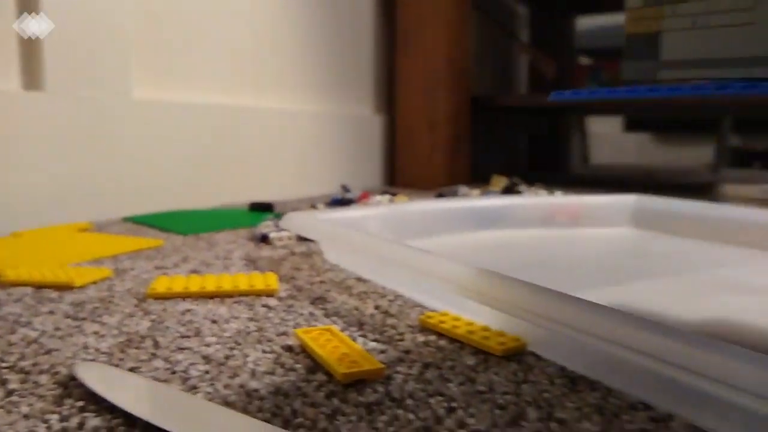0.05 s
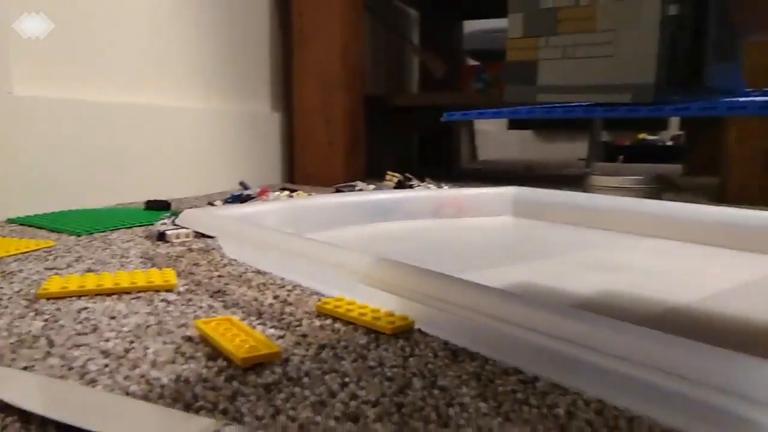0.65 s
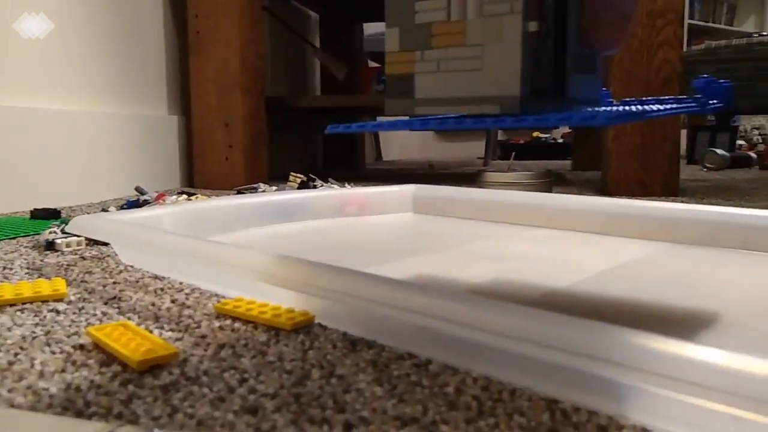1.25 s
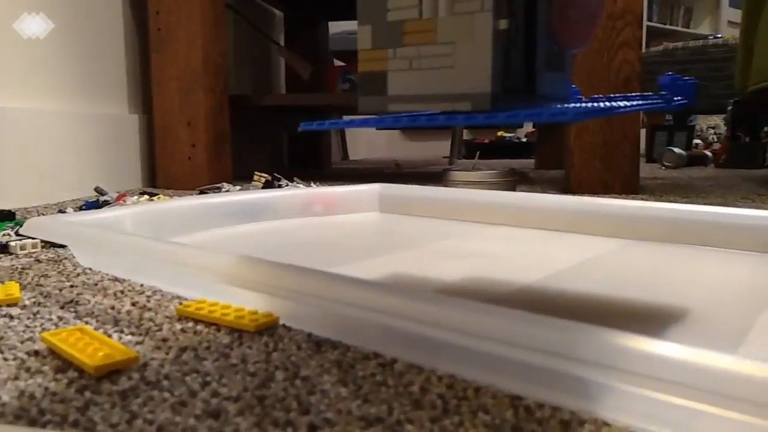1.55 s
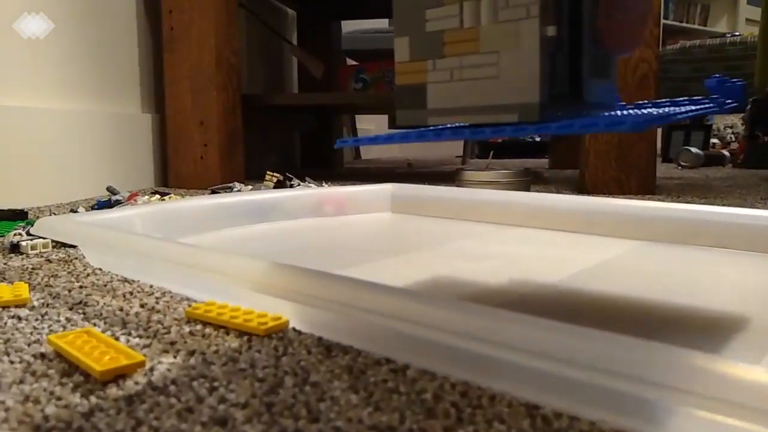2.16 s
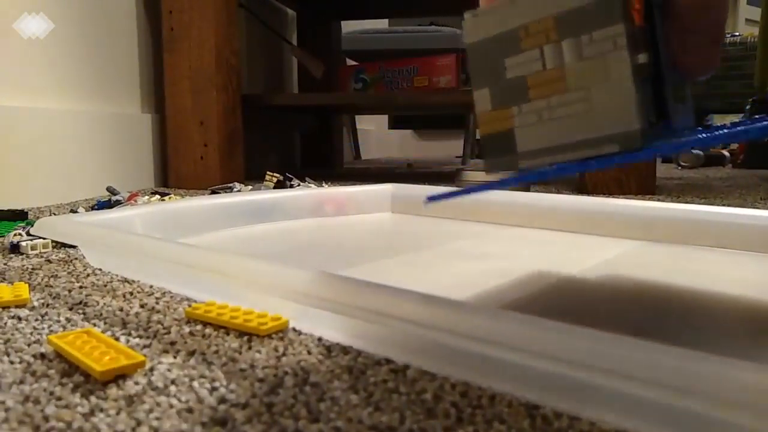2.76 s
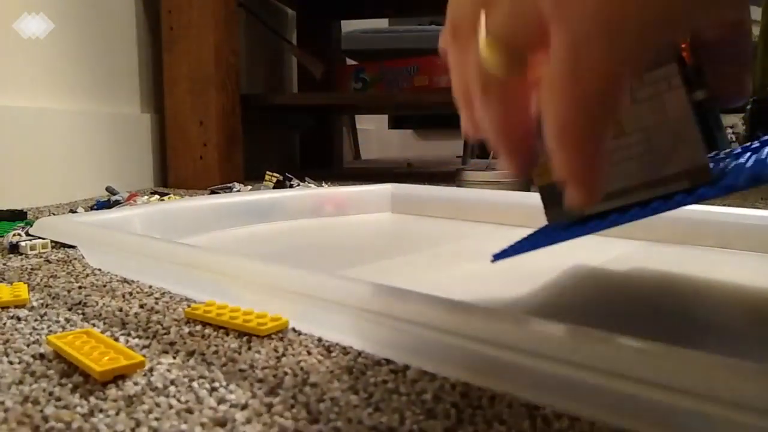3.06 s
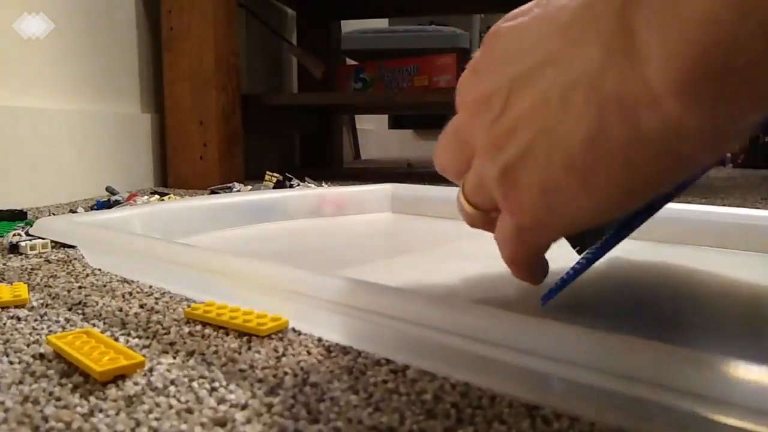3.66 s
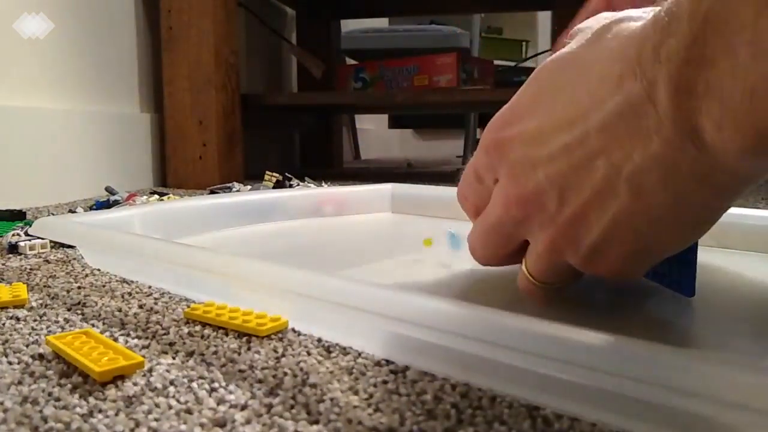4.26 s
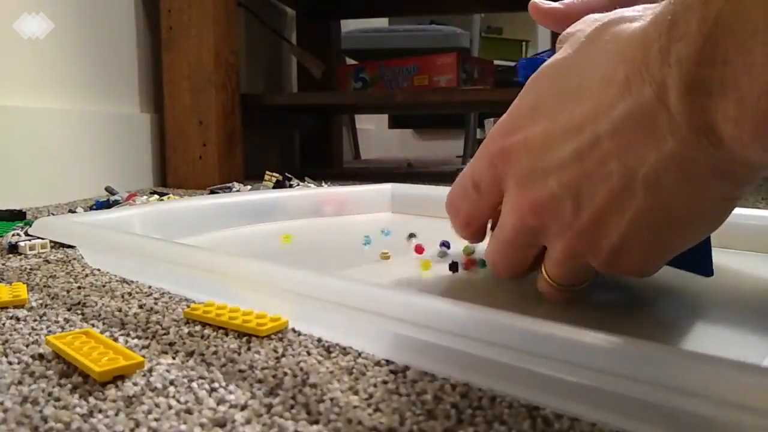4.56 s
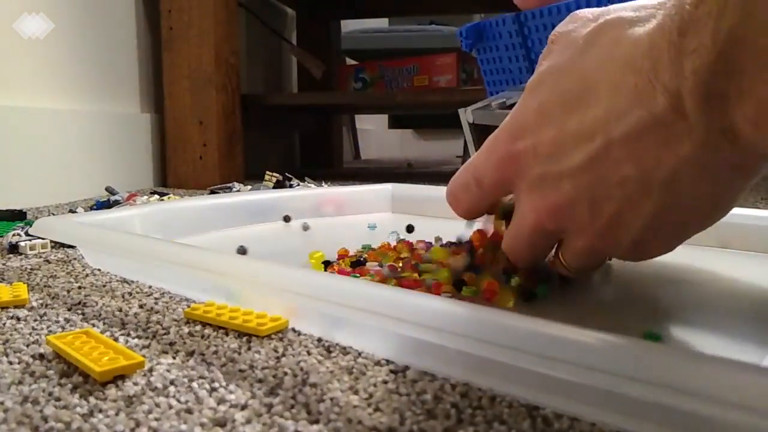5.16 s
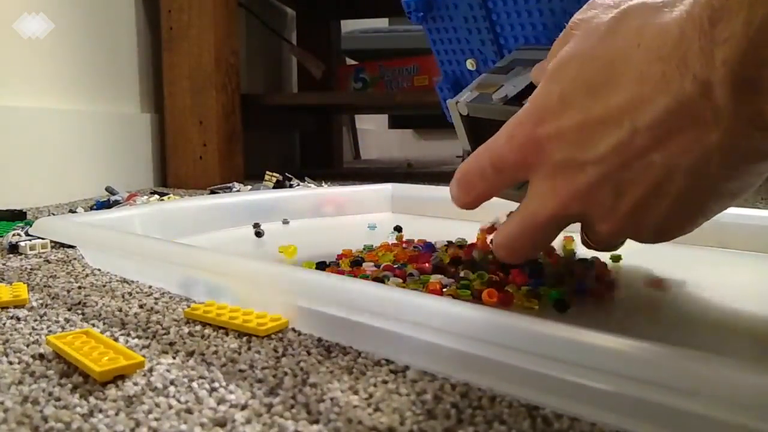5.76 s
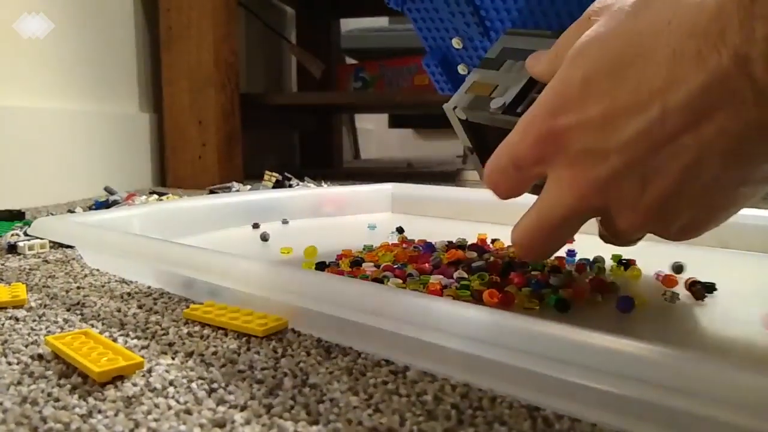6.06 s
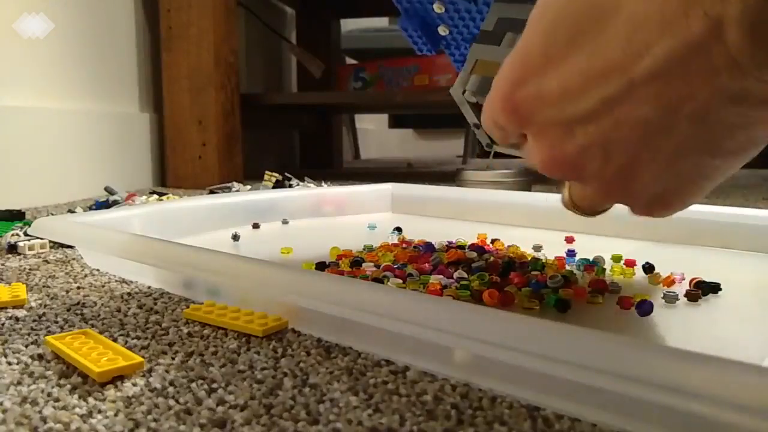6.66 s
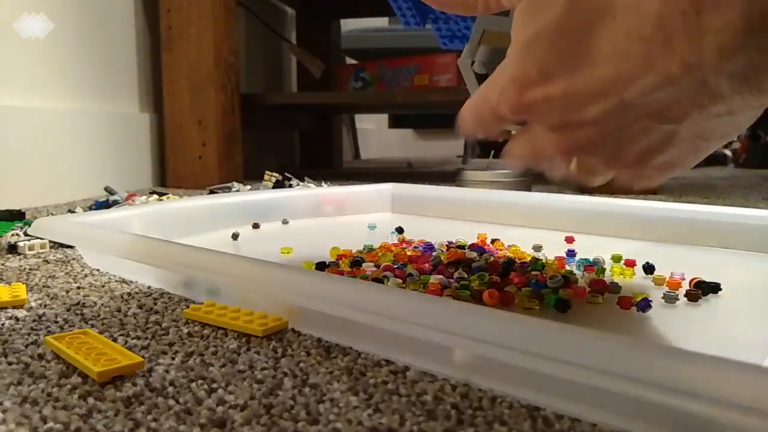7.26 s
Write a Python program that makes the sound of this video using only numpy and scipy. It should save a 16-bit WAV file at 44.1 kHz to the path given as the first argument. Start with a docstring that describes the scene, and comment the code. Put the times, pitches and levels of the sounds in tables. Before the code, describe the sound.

A toy brick box snaps as it is handled, then small plastic pieces slide out and clatter into a plastic tub.

```python
"""Fingers shift on a hand-held camera in a small room; close by, a hollow box of toy bricks is handled
with a few snaps. From 2.6 s the grip shifts and the box tips over a shallow plastic tub on a carpet:
hundreds of small plastic dots slide inside it. From 4 s they pour out, clatter on the tub floor and
heap up. Stragglers follow near 6.4 s, last knocks at 7 s. Heard through the camera's two mic ports."""
import sys
import numpy as np
from scipy import signal
from scipy.fft import rfft, irfft
from scipy.io import wavfile
from scipy.ndimage import uniform_filter1d

SR = 44100
rng = np.random.default_rng(int(sys.argv[2]) if len(sys.argv) > 2 else 0)


def inscribe(sig):
    """Save sig as 16-bit PCM at rate SR to the path in sys.argv[1].

    A 1-D sig is mono; a 2-D sig holds one channel per row.
    Samples are clipped to [-1, 1] before scaling.
    """
    pcm = np.round(np.clip(np.atleast_2d(sig).T, -1, 1) * 32767)
    wavfile.write(sys.argv[1], SR, pcm.astype(np.int16))


N = 321930
TIME_S = np.arange(N) / SR
IMPACT_TIME_S = np.arange(4096) / SR

# skin on plastic: freq_hz, density_db
RUSTLE_SPECTRUM = [(40, -29), (120, 6.5), (220, -5), (320, 3), (420, -2), (620, 3.5), (1100, -2.5),
                   (1600, -33), (3000, -39), (6000, -13), (16000, -38)]
# box resonances: freq_hz, width_hz, gain_db
BOX_MODES = [(380, 130, -20), (800, 237, 1), (1080, 400, 0.5), (1580, 280, 0.5), (2600, 570, -1.5),
             (3394, 230, -4.5), (5000, 2500, -12.5)]
# tub resonances, the last its whole floor flexing: freq_hz, width_hz, gain_db
TUB_MODES = [(248, 43, -7), (341.2, 87, 2), (422, 130, 4.5), (557, 86, 3.5), (894, 189, 5.5),
             (1066, 234, 7), (1496, 370, -7), (1585, 200, -7), (77, 120, -18)]


def amp(db):
    """Decibels to gain."""
    return 10 ** (np.asarray(db) / 20)


def unit_rms(x):
    """Scales to rms 1."""
    return x / np.sqrt(np.mean(x ** 2) + 1e-20)


def unit_peak(x):
    """Scales the loudest 2 ms to rms 1."""
    return x / np.sqrt(uniform_filter1d((x ** 2).mean(0), size=88, mode="constant").max())


def lookup(points, hz):
    """Interpolates a table on a log-frequency axis."""
    freq_hz, value = np.transpose(points)
    return np.interp(np.log(hz + 1), np.log(freq_hz + 1), value)


def envelope(points, fade_s=0.0052):
    """Gain over time from a dB curve, fading beyond its ends."""
    time_s, level_db = np.transpose(points)
    outside_s = np.maximum(time_s[0] - TIME_S, 0) + np.maximum(TIME_S - time_s[-1], 0)
    return amp(np.interp(TIME_S, time_s, level_db)) * np.exp(-outside_s / fade_s)


def stroke(start_s, length_s, rise_s, fade_s):
    """Attack, hold and release of one movement."""
    attack = np.clip((TIME_S - start_s) / rise_s, 0, 1)
    return attack * np.exp(-np.maximum(TIME_S - start_s - length_s, 0) / fade_s)


def add(mix, start_s, sound):
    """Mixes in a two-channel sound."""
    part = mix[:, round(start_s * SR):][:, :sound.shape[1]]
    part += sound[:, :part.shape[1]]


def colour(x, spectrum, size=2048):
    """Minimum-phase filter with the given spectrum."""
    log_gain = np.log(amp(lookup(spectrum, abs(np.fft.fftfreq(size, 1 / SR)))))
    taps = np.fft.ifft(np.exp(np.conj(signal.hilbert(log_gain)))).real
    return signal.oaconvolve(x, taps[None, :size // 2], axes=1)[:, :x.shape[1]]


def resonate(x, modes):
    """Parallel resonances of alternating polarity."""
    return sum((-1) ** k * amp(db) * signal.lfilter(*signal.iirpeak(hz, hz / width_hz, SR), x)
               for k, (hz, width_hz, db) in enumerate(modes))


def glide(x, hz, width_hz):
    """Steep resonance following the curve hz."""
    carrier = np.exp(2j * np.pi * np.cumsum(hz) / SR)
    pole = np.exp(-np.pi * width_hz / SR)
    return (carrier * signal.lfilter([(1 - pole) ** 2], [1, -2 * pole, pole ** 2], x / carrier)).real


def contact(chatter_s, snap, scatter_db, scatter_s, size=4096):
    """One impact at two points in the air: snap, short chatter, scatter from nearby plastic walls."""
    t = IMPACT_TIME_S[:size]
    decay = np.exp(-t / chatter_s) + amp(scatter_db) * np.exp(-t / scatter_s)
    force = decay * rng.standard_normal((2, size))
    force[0, 2] += snap
    return force / np.sqrt((force ** 2).sum(1, keepdims=True))


def grain(chatter_s, ring_db, ring_s=0.006, low_hz=2600, high_hz=12500, size=700):
    """One small impact; the pieces ring briefly at a random pitch."""
    force = contact(chatter_s, snap=4.1, scatter_db=-16, scatter_s=0.0038, size=size)
    t = IMPACT_TIME_S[:size]
    pitch_hz = low_hz * (high_hz / low_hz) ** rng.random()
    ring = np.exp(-t / ring_s) * np.sin(2 * np.pi * (pitch_hz * t + rng.random((2, 1))))
    return force + amp(ring_db) * ring / np.linalg.norm(ring[0])


def impacts(rate_per_s, spread_db, chatter_s, ring_db=-30, variants=300):
    """Random grains of many sizes, lengths and pitches at steady mean power."""
    grains = [grain(chatter_s * stretch, ring_db) for stretch in np.geomspace(0.5, 2, variants)]
    struck = rng.random(N) < rate_per_s / SR
    gains = struck * amp(spread_db * np.clip(rng.standard_normal(N), -2, 2))
    gains /= np.sqrt(abs(uniform_filter1d(gains ** 2, size=2000)) + 1e-4)
    choice = rng.integers(0, variants, N)
    out = np.zeros((2, N))
    for at in np.flatnonzero(gains):
        add(out, at / SR, gains[at] * grains[choice[at]])
    return out


def room_noise(hiss_db=-69, rumble_db=-73, rumble_hz=68):
    """Quiet, steady room noise over a faint rumble."""
    # background noise: freq_hz, density_db
    hiss_spectrum = [(20, -14), (40, -12), (60, 4), (100, 2), (250, -1.5), (500, -0.5), (1000, -6),
                     (2000, -8), (5000, -12.5), (8000, -16), (9500, -14), (11500, -22), (15500, -24)]
    hiss, rumble = rng.standard_normal((2, 2, N))
    return (amp(hiss_db) * unit_rms(colour(hiss, hiss_spectrum))
            + amp(rumble_db) * unit_rms(resonate(rumble, [(rumble_hz, 45, 0)])))


def camera_handling(rustle_db=-2, case_db=-4, case_hz=2750, port_db=-6, port_hz=9500):
    """Fingers slip on the camera: dull rustle, case ring, thin hiss in the mic port."""
    # hand movements: start_s, length_s, gain_db
    moves = [(-.1, 0.3, -67.5), (0.55, 0.16, -70.5), (0.99, 0.38, -67.5), (2.158, 0.066, -76.5)]
    slips = impacts(rate_per_s=650, spread_db=4, chatter_s=0.0065)
    tone = amp(rustle_db) * unit_rms(colour(slips, RUSTLE_SPECTRUM))
    for db, hz, width_hz in (case_db, case_hz, 900), (port_db, port_hz, 800):
        mode = [(hz, width_hz, 0)]
        tone += amp(db) * unit_rms(resonate(resonate(slips, mode), mode))
    return tone * sum(amp(db) * stroke(start_s, length_s, rise_s=0.086, fade_s=0.2)
                      for start_s, length_s, db in moves)


def box_knocks(body_mix_db=-6, crack_mix_db=-7, thud_mix_db=-5, thud_hz=215, base_t60_s=0.069):
    """Bricks snap and knock: hollow box, bright crack, thud through the hands, brief plate ring."""
    # blows on the box: start_s, gain_db, crack_db, thud_db, chatter_s, ring_hz, ring_db
    blows = [(0.154, -47, -28, -1, 0.005, 840, -1.5), (0.6831, -17.5, 1.5, -11.5, 0.0028, 560, -17),
             (0.752, -44, -7.5, -4, 0.011, 1020, -10), (0.771, -44.5, -7, 5, 0.011, 585, -7),
             (0.783, -23.5, -19, -2.5, 0.002, 1588, -0.5), (0.786, -25, 5.5, 4, 0.0028, 322, -5.5),
             (0.7929, -27.5, -9, 3, 0.0021, 1460, -7), (0.804, -41, -9, 10, 0.007, 929, 2),
             (.815, -42.5, -13, 11.5, 0.0066, 517, -14), (0.86, -52, -14, -4, .004, 980, -1),
             (1.061, -47, -29, -7, 0.0031, 1020, -5), (1.341, -46.5, -32, -8, 0.0076, 2770, -6),
             (1.551, -58.5, -12.5, -7, .0024, 1056, -0.5), (1.994, -54.5, -28.5, 2, .004, 1000, 2.5),
             (2.11, -57.5, -7, 4, .008, 1170, -16.5), (2.174, -60.5, -24.5, 10, 0.0046, 507, 0.5),
             (3.084, -50, -20.5, 11.5, 0.002, 275, -15), (3.294, -63, 9, -6, .004, 1100, -9),
             (3.367, -65, 6, -6, .003, 1100, -8), (3.415, -59, 6, -11, 0.0036, 1100, -14),
             (3.46, -36, 0.5, -1, 0.004, 1040, -1.5), (3.825, -55, 14.5, 8, 0.0047, 1077, 2),
             (7.025, -41, 1, -13, 0.0095, 1123, -9), (7.157, -55.5, -1, 2, 0.008, 128.6, 3)]
    # snapping brick: freq_hz, density_db
    crack_spectrum = [(500, -21.5), (2000, -28), (4100, 1.5), (5200, -10), (8200, -8.5), (9400, -2.5),
                      (10800, -15.5), (13500, -18), (15500, -27)]
    lowpass = signal.butter(2, 5000, fs=SR, output="sos")
    out = np.zeros((2, N))
    for start_s, gain_db, crack_db, thud_db, chatter_s, ring_hz, ring_db in blows:
        box_force = contact(chatter_s, snap=2, scatter_db=-2.5, scatter_s=0.0099)
        hollow = unit_peak(signal.sosfilt(lowpass, resonate(box_force, BOX_MODES)))
        crack_force = contact(chatter_s, snap=1.8, scatter_db=-29.5, scatter_s=0.009)
        crack = amp(crack_db + crack_mix_db) * unit_peak(colour(crack_force, crack_spectrum))
        thud_force = contact(chatter_s, snap=15, scatter_db=-17, scatter_s=0.012)
        thud = amp(thud_db + thud_mix_db) * unit_peak(resonate(thud_force, [(thud_hz, 330, 0)]))
        t60_s = base_t60_s * 0.5 ** (thud_db / 10.5)  # fingers taking more thud damp the plate
        plate = np.sin(2 * np.pi * ring_hz * IMPACT_TIME_S) * amp(-60 * IMPACT_TIME_S / t60_s)
        body = amp(body_mix_db) * (hollow + amp(ring_db) * plate)
        add(out, start_s, amp(gain_db) * (body + crack + thud))
    return out


def grip_rub(hollow_width_hz=150, scuff_hz=1300, rasp_hz=2700):
    """Skin slips on the box: dull rustle, raspy scuff, a hollow tone gliding as the hand covers it."""
    # grip shifts: start_s, length_s, rustle_db, hollow_db, from_hz, to_hz, scuff_db
    shifts = [(2.629, 0.6, -76.5, -70.5, 260, 348, -76), (2.975, 0.15, -58, -67, 290, 264, -51.5),
              (3.45, 0.58, -64.5, -66.5, 378, 384, -68.5), (3.545, 0.037, -64.5, -58.5, 377, 415, -84)]
    slips = impacts(rate_per_s=1500, spread_db=0, chatter_s=0.0096)
    rustle = unit_rms(colour(slips, RUSTLE_SPECTRUM))
    scuff = unit_rms(resonate(slips, [(scuff_hz, 500, 0), (rasp_hz, 550, -2)]))
    out = np.zeros((2, N))
    for start_s, length_s, rustle_db, hollow_db, from_hz, to_hz, scuff_db in shifts:
        pitch_hz = np.interp(TIME_S, [start_s, start_s + length_s], [from_hz, to_hz])
        hollow = unit_rms(glide(slips, pitch_hz, hollow_width_hz))
        tone = amp(rustle_db) * rustle + amp(hollow_db) * hollow + amp(scuff_db) * scuff
        out += stroke(start_s, length_s, rise_s=0.012, fade_s=0.048) * tone
    return out


def dot_slide(box_db=-3, tub_db=-16, grit_db=-7, grit_hz=1150, sizzle_mix_db=-4):
    """Dots creep, then rush along the box, colliding and grating over studs; the tub under it rings."""
    # slips of the load: start_s, length_s, rise_s, hollow_db, sizzle_db
    slips = [(2.693, 1.54, 0.081, -69.5, -61), (2.865, 0.27, 0.17, -52.5, -53),
             (3.544, 0.1, 0.024, -58.5, -75), (3.81, 0.12, 0.15, -31.5, -40),
             (3.959, 0.12, 0.003, -33, -29.5), (4.011, 0.2, 0.09, -33.5, -21.5),
             (6.439, 0.18, 0.081, -54, -45)]
    # sliding dots: freq_hz, density_db
    scrape_spectrum = [(100, -20.5), (700, -9.5), (1900, -30.5), (3300, -7.5), (4800, -7.5), (6000, -10),
                       (7500, -4), (8400, -4), (9300, -1.5), (10200, -5), (11200, -17), (15500, -20.5)]
    collisions = impacts(rate_per_s=1100, spread_db=-1, chatter_s=0.0036)
    stud_bumps = impacts(rate_per_s=260, spread_db=0, chatter_s=0.0013)
    grit = amp(grit_db) * unit_rms(resonate(stud_bumps, [(grit_hz, 170, 0)]))
    box = amp(box_db) * unit_rms(resonate(collisions, BOX_MODES))
    tub = amp(tub_db) * unit_rms(resonate(collisions, TUB_MODES))
    sizzle = amp(sizzle_mix_db) * unit_rms(colour(collisions, scrape_spectrum))
    out = np.zeros((2, N))
    for start_s, length_s, rise_s, hollow_db, sizzle_db in slips:
        tone = amp(hollow_db) * (box + tub + grit) + amp(sizzle_db) * sizzle
        out += stroke(start_s, length_s, rise_s, fade_s=0.016) * tone
    return out


def hard_landings(tub_db=-5, flex_db=-5.5, flex_base_hz=290, mic_ring_hz=9350, rebound_db=-6.5):
    """Dots snap and thump on bare tub; on the heap they are cushioned, ticks ringing in the mic port."""
    # dots landing hard: start_s, tick_db, thump_db
    landings = [(3.9635, -28, -39), (3.9723, -32, -43), (4.03, -24.5, -40), (4.1372, -18.5, -38),
                (4.2256, -21.5, -32), (4.2319, -21.5, -37), (4.2387, -16.5, -28), (4.2882, -13.5, -25),
                (4.292, -22, -29), (4.3268, -16, -27), (4.3305, -16.5, -26), (4.343, -25, -36),
                (4.3719, -12.5, -25), (4.3745, -18.5, -22), (4.402, -24, -35), (4.4111, -20, -31),
                (4.4178, -23, -39), (4.423, -22, -33), (4.4331, -19.5, -31), (4.4592, -17, -29),
                (4.4703, -17, -27), (4.4773, -17.5, -30), (4.5135, -21, -31), (4.5198, -18, -29),
                (4.5543, -15, -28), (4.5623, -17.5, -29), (4.5931, -18, -28), (4.597, -16.5, -28),
                (4.622, -16.5, -29), (4.6641, -19, -28), (4.6738, -20, -24), (4.6825, -20, -27),
                (4.7071, -18, -22), (4.729, -14.5, -23), (4.746, -20, -20), (4.7735, -15, -26),
                (4.7772, -15, -24), (4.819, -14.5, -26), (4.8378, -13.5, -21), (4.849, -15, -23),
                (4.88, -13.5, -22), (4.9, -14, -24), (4.9189, -12.5, -25), (4.9565, -12, -25),
                (4.9792, -14, -24), (4.9885, -12.5, -25), (5.012, -14, -25), (5.043, -13, -25),
                (5.0917, -10.5, -22), (5.1147, -14, -25), (5.1641, -11, -22), (5.168, -11, -22),
                (5.178, -14, -23), (5.2281, -11.5, -21), (5.2625, -13.5, -26), (5.2872, -13, -25),
                (5.2925, -12, -21), (5.3212, -8.5, -26), (5.335, -13, -26), (5.3891, -13.5, -28),
                (5.399, -12, -27), (5.4185, -14, -29), (5.428, -13.5, -29), (5.4398, -6.5, -27),
                (5.4478, -10, -27), (5.4625, -12, -25), (5.4857, -12, -27), (5.4937, -13.5, -25),
                (5.5146, -14, -26), (5.5243, -16.5, -33), (5.5795, -16.5, -28), (5.5877, -10, -31),
                (5.5958, -16.5, -31), (5.62, -18, -32), (5.6438, -14, -28), (5.6733, -17.5, -31),
                (5.7101, -16.5, -23), (5.7241, -17.5, -32), (5.7597, -16, -30), (5.773, -14.5, -30),
                (5.798, -14.5, -30), (5.8106, -15.5, -30), (5.8275, -7.5, -27), (5.8295, -11, -30),
                (5.8376, -14, -28), (5.8437, -15, -29), (5.8918, -18.5, -34), (5.937, -22, -37),
                (5.9475, -21, -38), (5.9671, -15.5, -41), (5.9895, -25, -39), (6.0253, -24, -36),
                (6.055, -30, -44), (6.0641, -24, -38), (6.0995, -33, -45), (6.1437, -23.5, -50),
                (6.158, -35, -52), (6.1755, -30.5, -46), (6.19, -33, -47), (6.2005, -35, -50),
                (6.2211, -31.5, -48), (6.247, -38, -52), (6.2597, -40, -56), (6.3259, -46, -60),
                (6.4075, -37, -54), (6.4164, -18, -31), (6.4275, -33, -42), (6.441, -37, -50),
                (6.4613, -29.5, -44), (6.4868, -24.5, -36), (6.4885, -26.5, -37), (6.4925, -31, -42),
                (6.5036, -35, -51), (6.5116, -37, -51), (6.5382, -26, -39), (6.5662, -31, -43),
                (6.5988, -35, -47), (6.6073, -41, -53)]
    # bare floor (0), then heap (1), then stragglers rolling off it: time_s, cover_fraction
    cover_curve = [(4.55, 0), (4.8, 1), (5.8, 1), (5.96, 0.1)]
    # landing snap: freq_hz, density_db
    snap_spectrum = [(60, -37), (300, -25.5), (1200, -9), (2300, -11), (3300, -8), (4400, -2.5),
                     (6000, -8.5), (8300, -5), (9250, -0.5), (10100, -4), (11200, -13), (13000, -14),
                     (15500, -15.5)]
    out = np.zeros((2, N))
    for start_s, tick_db, thump_db in landings:
        sharpness = np.clip(0.65 + 0.03 * tick_db, -0.6, 0.8)  # harder is brighter
        cover = np.interp(start_s, *np.transpose(cover_curve))
        chatter_s = 0.0013 + 0.0006 * cover
        tick_gain = amp(tick_db + 1.5 - 2.5 * cover)
        thump_gain = amp(thump_db - 4.5 * cover)
        rebound_s = 0.003 * rng.uniform(1.0, 1.2)  # the dot tips onto its other edge
        for delay_s, tap_db in (0, 0), (rebound_s, rebound_db):
            force = contact(chatter_s, snap=5.5 - 3.7 * cover, scatter_db=-22, scatter_s=0.005)
            snap = colour(signal.lfilter([1, -sharpness], [1], force), snap_spectrum)
            tick = unit_peak(snap + cover * resonate(snap, [(mic_ring_hz, 800, -4)]))
            flex = unit_peak(resonate(force, [(flex_base_hz * rng.uniform(0.85, 1.75), 150, 0)]))
            thump = amp(tub_db) * unit_peak(resonate(force, TUB_MODES)) + amp(flex_db) * flex
            add(out, start_s + delay_s, amp(tap_db) * (tick_gain * tick + thump_gain * thump))
    return out


def dot_pour(tick_db=-0.5, tub_db=-12.5, full_heap_db=-3, trickle_per_s=520, surge_per_s=1300):
    """More flow lands more dots a second; they tick and drum on the tub, cushioned as the heap grows."""
    # stream swells and dies, a last shake frees a few more dots: time_s, flow_db
    flow_curve = [(4.22, -22.5), (4.3, -27), (4.36, -30.5), (4.41, -28), (4.53, -24.5), (4.6, -22),
                  (4.7, -18.5), (4.87, -14.5), (5.38, -14.5), (5.58, -20.5), (5.81, -17.5), (6.02, -29),
                  (6.13, -41), (6.25, -44.5), (6.3, -55), (6.39, -58), (6.42, -44), (6.61, -49),
                  (6.75, -62), (7.2, -68)]
    # ticking dots: freq_hz, density_db
    tick_spectrum = [(60, -39), (300, -33), (1200, -8.5), (2300, -10), (3300, -13), (4400, -8.5),
                     (6200, -9), (8500, -5), (9250, -1), (10100, -3.5), (11200, -11.5), (13000, -12),
                     (15500, -14.5)]
    flow = envelope(flow_curve)
    heap = np.cumsum(flow) / flow.sum()
    rate_per_s = trickle_per_s + surge_per_s * flow / flow.max()
    hits = impacts(rate_per_s, spread_db=1, chatter_s=0.0018, ring_db=-6.5)
    ticks = amp(tick_db) * flow * unit_rms(colour(hits, tick_spectrum))
    drum = amp(tub_db + full_heap_db * heap) * flow ** 0.93 * unit_rms(resonate(hits, TUB_MODES))
    return ticks + drum


def room(x, wet_db, build_s=0.0062):
    """Adds a short diffuse tail, each band dying at its own rate."""
    # room decay: freq_hz, t60_s
    decay_times = [(150, 0.25), (1000, 0.056), (4000, 0.1), (9000, 0.023), (16000, 0.028)]
    hz, t, bands = signal.stft(rng.standard_normal((2, SR // 2)), SR, nperseg=256)
    bands *= amp(-60 * t / lookup(decay_times, hz)[:, None])
    tail = signal.istft(bands * (1 - np.exp(-t / build_s)), SR, nperseg=256)[1]
    return x + amp(wet_db) * signal.fftconvolve(x, tail / np.linalg.norm(tail[0]), axes=1)[:, :N]


def scene(low_cut_hz=55):
    """The near box is dry, the open tub fills the room; light plastic radiates no deep bass."""
    box = room(box_knocks() + grip_rub(), wet_db=-36)
    stream = room(dot_slide() + dot_pour(), wet_db=-12)
    landings = room(hard_landings(), wet_db=-13)
    highpass = signal.butter(2, low_cut_hz, "highpass", fs=SR, output="sos")
    return signal.sosfilt(highpass, box + stream + landings) + camera_handling() + room_noise()


def record(dry, band_limit_hz=15700):
    """Two spaced ports hear partly the same sound, the left slightly later; clipped, then low-passed."""
    # left port relative to right: freq_hz, lead_rad
    port_phase = [(90, -2.2), (170, -1.2), (260, -0.5), (600, 0), (1550, -0.1), (2100, -3.1), (2700, -4.0),
                  (3000, -5.9), (3450, -6.6), (3850, -9.6), (4550, -9.6), (5300, -12.4), (6000, -15.1),
                  (6400, -15.8), (7000, -18.4), (7400, -18.8), (8500, -22.1), (9400, -25.2), (10000, -27.6),
                  (12200, -34.5)]
    # likeness of the ports: freq_hz, coherence_fraction
    port_coherence = [(40, .3), (90, .6), (200, .7), (420, .96), (550, .9), (680, .45), (800, .96),
                      (1200, .97), (1650, .55), (1950, .6), (2130, .96), (2400, .8), (2750, .3),
                      (3150, .88), (3380, .88), (3570, .15), (3850, .96), (4120, 1), (4450, .95),
                      (4850, .45), (5300, .9), (5600, .5), (6000, .5), (6300, .98), (6750, .5), (7400, .97),
                      (7900, .7), (8500, .95), (9400, .95), (10250, .92), (11200, .7), (13000, .25)]
    # port balance: freq_hz, left_minus_right_db
    port_balance = [(60, 2.5), (300, 5.5), (600, -0.4), (4100, 1), (8500, 0.7), (9300, 3), (11000, -0.5),
                    (14500, 2.8)]
    hz = np.fft.rfftfreq(N, 1 / SR)
    direct, other = rfft(dry)
    coherence = np.clip(lookup(port_coherence, hz), 0, 1)
    left = direct * np.exp(1j * lookup(port_phase, hz))
    right = coherence * direct + np.sqrt(1 - coherence ** 2) * other
    lean = amp(lookup(port_balance, hz) / 2)
    pair = np.clip(irfft(np.array([left * lean, right / lean]), N), -1, 1)
    lowpass = signal.firwin(255, band_limit_hz, window=("kaiser", 9), fs=SR)
    return signal.oaconvolve(pair, lowpass[None], "same")


dry = scene()
out = record(dry)
inscribe(out)
```